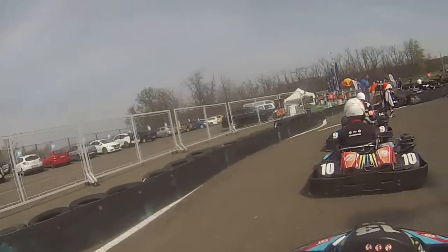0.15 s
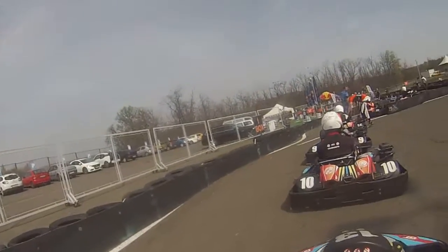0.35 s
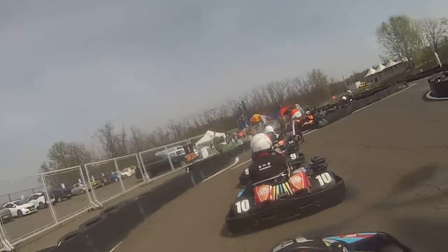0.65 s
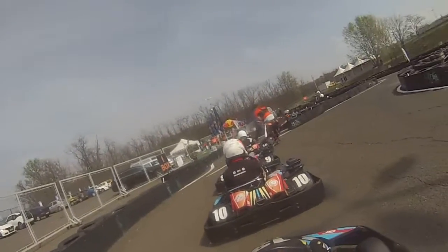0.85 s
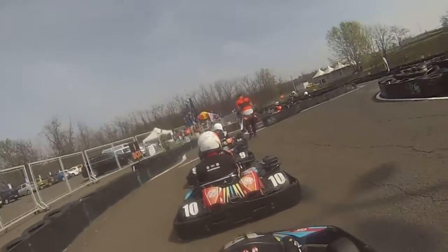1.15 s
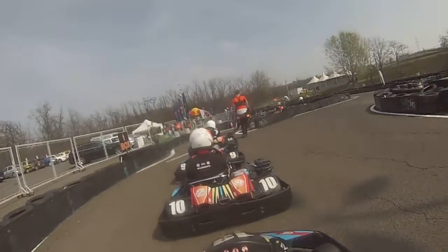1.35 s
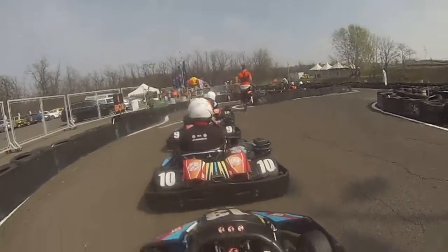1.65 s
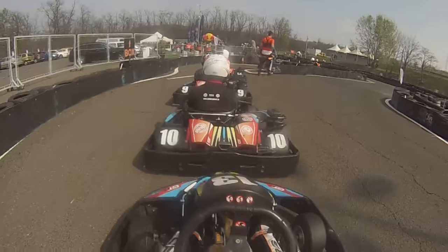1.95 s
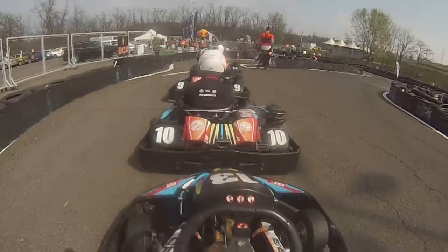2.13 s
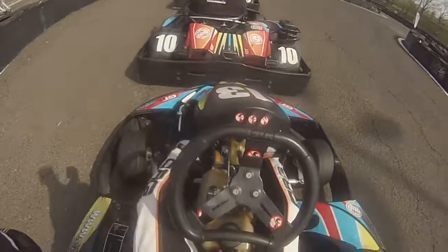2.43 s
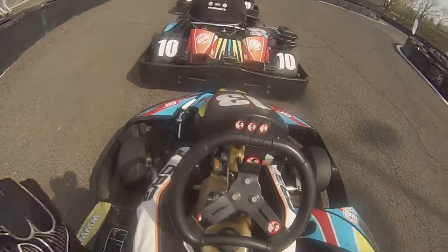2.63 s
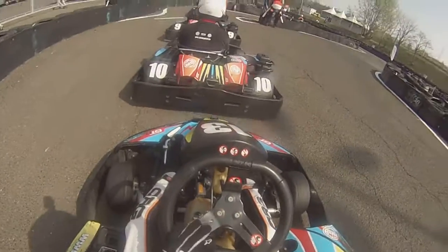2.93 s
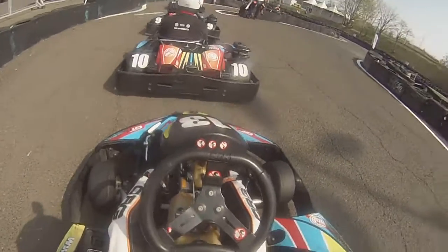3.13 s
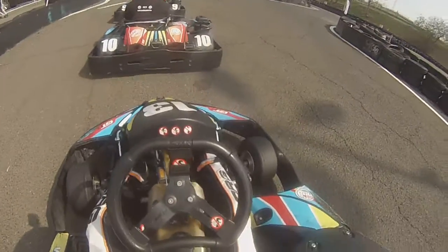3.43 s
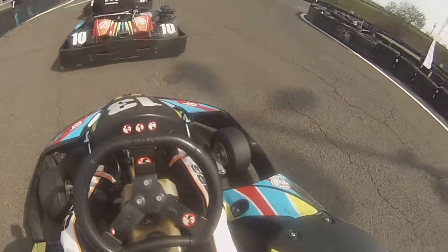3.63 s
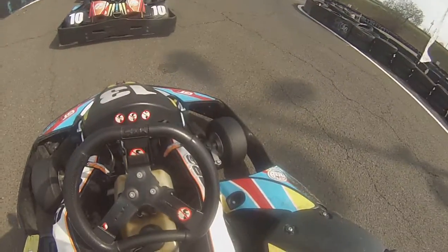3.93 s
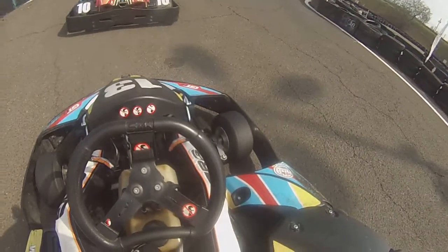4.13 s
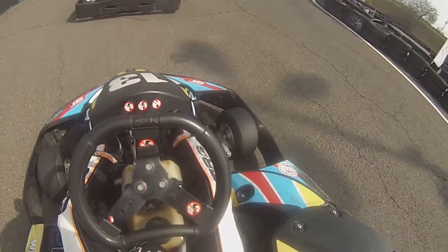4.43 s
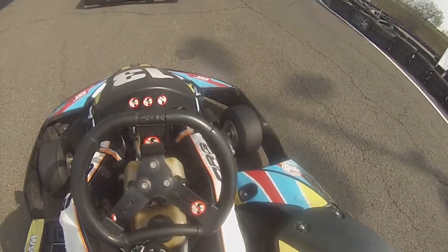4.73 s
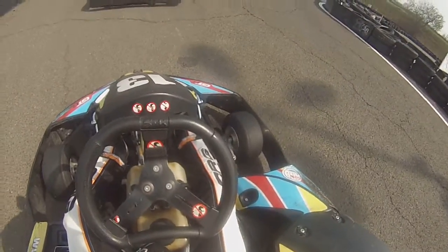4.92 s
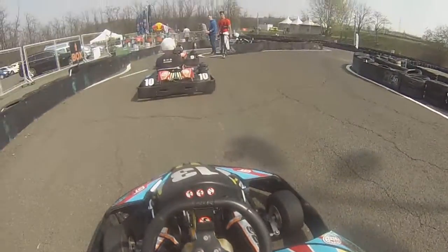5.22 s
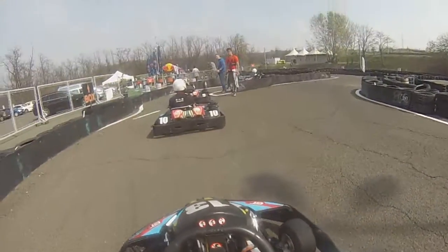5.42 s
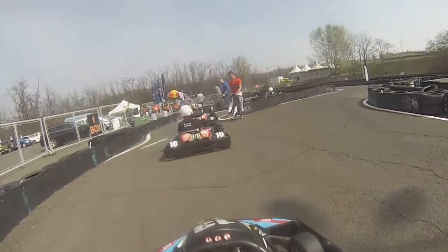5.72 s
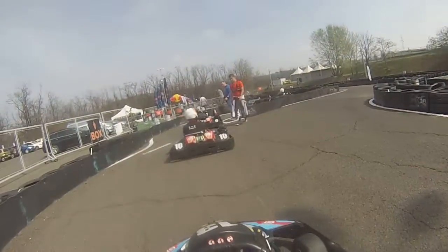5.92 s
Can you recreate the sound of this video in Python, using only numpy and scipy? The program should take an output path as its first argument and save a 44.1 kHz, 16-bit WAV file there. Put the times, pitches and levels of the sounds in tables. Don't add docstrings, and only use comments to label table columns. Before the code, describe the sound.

Close, muffled sound from a sealed camera on a helmet at an outdoor kart track. A four-stroke single-cylinder engine starts with a short rev at about 0.3 s, then sinks to a slow, lumpy idle of roughly fourteen firings a second, with pulsing gas hiss, valve ticking, hollow drone and deep rumble. From 1.87 s a glove fumbles against the helmet: soft low bumps and small cracks, the hardest crack and boom at 2.2 s, then rapid knocks to 2.33 s. The engine ducks almost away and returns by 2.48 s. Another kart ahead adds a bright rasp from 2.5 to 3 s, fading. The idle continues, more ringing and mid-heavy, with strong low throbbing around 4 to 4.7 s. A sharp rev swells at 5 s with a deep helmet shudder, eases at 5.4 s, then revs higher at 5.7 s and falls toward the end.

```python
import sys
import numpy as np
from scipy import signal
from scipy.fft import rfft, irfft
from scipy.io import wavfile
from scipy.ndimage import uniform_filter1d

SR = 44100
rng = np.random.default_rng(int(sys.argv[2]) if len(sys.argv) > 2 else 0)


def voltage_ratio(decibels):
    exponent = np.asarray(decibels, float) / 20
    return 10 ** exponent


def put_to_file(sound):
    columns = np.atleast_2d(sound).T
    safe = np.clip(columns, -1, 1)
    whole_steps = np.round(safe * 32767)
    wavfile.write(sys.argv[1], SR, whole_steps.astype(np.int16))


N = 267687
T = np.arange(N) / SR

# time_s, cycles_per_s
ENGINE_SPEED = [(0.0, 13.81), (0.24, 18.65), (0.38, 19.66), (0.67, 16.53), (0.92, 15.41), (1.86, 13.58),
                (2.46, 14.37), (2.77, 13.23), (3.64, 13.62), (4.02, 13.13), (4.28, 13.38), (4.71, 12.77),
                (4.93, 19.36), (5.09, 20.81), (5.4, 16.86), (5.67, 22.63), (5.8, 22.62), (6.07, 17.98)]
START_CYCLE, IDLE_CYCLES_PER_S = .56, 14
# time_s, level_db
SEAT_SHAKE = [(0, -30), (.25, -28), (.5, -29.5), (.62, -39.5), (.75, -35.5), (1.3, -49), (2.7, -29),
              (3.45, -40.5), (4.05, -28), (4.65, -26.5), (4.98, -24.5), (5.08, -36.5), (5.26, -28),
              (5.37, -29), (5.48, -23.5), (5.62, -31.5), (5.8, -21.5), (6.07, -31)]
# time_s, level_db at the padding resonance
HELMET_CONTACT = [(0, -56), (.3, -45), (.75, -46.5), (1.3, -61.5), (2.7, -41), (2.85, -32), (3.1, -46),
                  (3.45, -42.5), (3.9, -25), (4.1, -22), (4.5, -21.5), (4.72, -31.5), (4.84, -23.5),
                  (4.94, -24.5), (5.03, -11.5), (5.16, -27), (5.4, -37), (6.07, -54)]
ORDER_LEVELS = [3.5, 3, -3.5]
ORDER_LAGS = [.4, -.43, -.3, -.4]
PADDING_HZ, PADDING_WIDTH_HZ, PADDING_STEEPNESS = 59, 16.4, 2.18

# time_s, hiss_db
ENGINE_EFFORT = [(0, -50), (.3, -45.5), (.6, -47.5), (1.2, -51.5), (2.03, -51), (2.56, -40.5),
                 (2.84, -42.5), (3.2, -45.5), (4.1, -44.5), (4.7, -44), (4.95, -36), (5.36, -40.5),
                 (5.62, -35), (5.92, -38.5), (6.07, -37.5)]
# time_s, bent_share (0-1), exhaust_ring_db
HEAD_POSE = [
    (0, 0, -76),
    (1.8, .1, -76),
    (2.9, .9, -68),
    (3.4, 1, -55),
    (4.7, 1, -54),
    (5.1, .2, -68),
    (6.07, 0, -74),
]
# head_up_db, head_down_db
TREBLE_LEVELS = (-9.5, -14)
DRONE_LEVELS = (-5, -6)
RUMBLE_LEVELS = (-8.5, -3.5)
# time_s, shell_gain_db, length_s
THROTTLE_BLIPS = [
    (0.322, 7.5, 0.14),
    (1.655, 5.5, 0.084),
    (2.652, 3, .15),
    (4.406, 7, 0.18),
    (4.995, 9.5, 0.13),
    (5.633, 5, 0.15),
]
RUMBLE_THROTTLE_SHARE = 0.38
# pitch_hz, width_hz, head_up_db, head_down_db
CASE_MODES = [(537, 330, -12.5, -22.5), (828, 336, -10.5, -5), (1167, 46, -7, -0.5), (1436, 240, -1.5, 2),
              (1760, 260, -9, -7), (2240, 346, -5.5, -3), (2383, 190, -18, -3.5), (3150, 520, -20, -51),
              (3902, 680, -15.5, -12.5), (4654, 180, -18.5, -16), (5070, 980, -23.5, -18),
              (6580, 1100, -27, -19.5), (7820, 380, -31, -23), (8840, 400, -34, -26),
              (9600, 1100, -44, -34), (11870, 700, -40, -31.5), (12900, 500, -47, -36),
              (14300, 500, -49, -35)]
ZONE_BORDERS = [1900, 3000, 5500]
# place_cycles, length_cycles, then level_db over the steady hiss in each zone
GAS_BURSTS = [(.44, .1, 3.5, 1, 0, 0), (.74, .09, 4, 3.5, 6, 4.5), (.0, .1, 0, 5.5, 5, 9)]
BURST_FLATTENING = [0, 1.5, 1.5, .4]
# pitch_hz, place_cycles, length_cycles, level_db under the hiss, rise_db per doubled speed
PART_RINGS = [(1400, .4, .11, -13, 8), (1480, .73, .1, -13, 8), (2260, .05, .07, -14, -8),
              (3950, .76, .06, -23, 6), (5250, .02, .05, -26, -6), (6600, .0, .05, -29, 0),
              (11800, .0, .04, -44, 0)]
# pitch_hz, width_hz, level_db
DRONE_MODES = [(161, 48, -2), (300.5, 50, 3.5), (347, 50, -3), (472, 190, -11.5)]
DRONE_THROB = .5
# pitch_hz, level_db per hertz
RUMBLE_SPECTRUM = [(5, 0), (12, 14), (25, 8), (60, 10), (85, 2), (150, 0), (220, -6), (400, -12),
                   (900, -24), (2500, -60), (20000, -130)]

# start_s, crack_peak_db, shell_db and tick_db compared with the crack
GLOVE_KNOCKS = [(1.8919, -30, 3, -25), (1.896, -24, -0.5, -36), (1.905, -26, 1.5, -34),
                (1.9293, -37, -24, -13.5), (2.077, -40.5, 0, -10), (2.1346, -30, 2, -27),
                (2.1942, -33.5, 5.5, -2), (2.2025, -26, -24, -24), (2.208, -5, -13.5, -8.5),
                (2.215, -22, -2, -21), (2.2233, -17, -0.5, -8), (2.2362, -13, -21, -11.5),
                (2.2471, -17, -2.5, -9), (2.262, -20, -2.5, -12), (2.2845, -25.5, 3.5, -28),
                (2.2935, -17, -3.5, -9.5), (2.302, -19.5, -1, -35), (2.3204, -36.5, 4.5, -38),
                (2.331, -43, -7, -8)]
# pitch_hz, width_hz, level_db
LID_MODES = [(765, 87, -10.5), (1372, 280, 1), (2066, 450, 0), (2580, 270, -27)]
# pitch_hz, width_hz, level_db
SHELL_MODES = [(158, 47, 4), (295, 52, 3.5), (477, 180, -11.5), (560, 250, -15.5)]
# start_s, peak_db, pitch_hz, fade_s (by 60 dB), direction
HELMET_SHOVES = [(1.865, -17.5, 56, 0.1, -1.06), (1.9093, -8.5, 63.5, 0.053, 0.92),
                 (1.943, -14, 60, 0.39, 0.68), (2.135, -17.5, 70.6, 0.15, -0.64), (2.181, -14, 50, .06, -1),
                 (2.191, -2, 73, 0.17, 0.81), (2.216, -1, 130, .02, 1), (2.2205, 4, 75, .035, -1),
                 (2.237, -14, 45, 0.096, 1), (2.298, -10, 51, 0.17, 0.73), (2.319, -5.5, 59, 0.041, -1),
                 (2.327, -8, 59, 0.38, 0.74), (2.473, -20.5, 54.3, 0.97, 0.91),
                 (2.562, -18, 60.7, 0.071, 1), (2.883, -21, 57.8, 0.23, 0.75)]
# time_s, gain_db
GAIN_DUCK = [
    (2.2, 1),
    (2.23, -20),
    (2.33, -23.5),
    (2.42, -18),
    (2.465, -14.5),
    (2.485, -8.5),
]

# time_s, firings_per_s, level_db
KART_AHEAD = [
    (2.3, 17, -74),
    (2.48, 17.5, -49),
    (2.6, 19, -47),
    (2.9, 19.4, -50.5),
    (3.0, 19.4, -58),
    (3.3, 19.4, -76),
]
AHEAD_FIRES_S = 2.709
# order (multiple of the firing rate), level_db over the rasp
AHEAD_NOTE = [(6, 4), (9, 2), (12, -4), (14.5, 5)]
SELF_NOISE_DB = -88


def unit(x):
    return x / np.sqrt(np.mean(x ** 2))


def curves(rows):
    time_s, *columns = np.transpose(rows)
    return [np.interp(T, time_s, column) for column in columns]


def walk(rate):
    hold = int(SR / rate)
    steps = np.repeat(rng.standard_normal(N // hold + 1), hold)
    return 0.682 * uniform_filter1d(uniform_filter1d(steps, hold), hold)[:N]


def colour(x, power, size=8192):
    hz = np.arange(size // 2 + 1) * SR / size + 1
    cepstrum = irfft(np.log(power(hz)) / 2)
    cepstrum[1:size // 2] *= 2
    cepstrum[size // 2 + 1:] = 0
    response = irfft(np.exp(rfft(cepstrum)))
    return signal.fftconvolve(x, response)[:N]


def resonances(modes):
    def power(f):
        total = 0
        for hz, width, db in modes:
            off = (f - hz * hz / f) / width
            total = total + voltage_ratio(db) ** 2 / (1 + off ** 2) ** 1.5
        membrane = 1 + (f / 12500) ** 8
        return total / membrane
    return power


def zones(x):
    lows = []
    for hz in ZONE_BORDERS:
        lowpass = signal.butter(3, hz, fs=SR, output="sos")
        lows.append(signal.sosfiltfilt(lowpass, x))
    return np.diff([0 * x, *lows, x], axis=0)


def through_case(x, down):
    head_up = colour(x, resonances([(hz, width, up_db) for hz, width, up_db, _ in CASE_MODES]))
    head_down = colour(x, resonances([(hz, width, down_db) for hz, width, _, down_db in CASE_MODES]))
    return (1 - down) * head_up + down * head_down


def engine_shake(cycle):
    speed, seat_db, contact_db = curves(ENGINE_SPEED)[0], curves(SEAT_SHAKE)[0], curves(HELMET_CONTACT)[0]
    order_levels = [seat_db]
    for order, db in enumerate(ORDER_LEVELS, start=3):
        hz = order * speed
        off = (hz - PADDING_HZ ** 2 / hz) / PADDING_WIDTH_HZ
        order_levels.append(contact_db + db - 10 * PADDING_STEEPNESS * np.log10(1 + off ** 2))
    shake = voltage_ratio(seat_db - 23.0) * np.cos(2 * np.pi * (cycle + 0.51))
    for k, db in enumerate(order_levels):
        unsteady_level = voltage_ratio(db + 1.0 * walk(3.7))
        turns = (k + 2) * cycle + ORDER_LAGS[k] + 0.022 * walk(12)
        shake = shake + unsteady_level * np.cos(2 * np.pi * turns)
    return np.sqrt(2) * shake


def air_levels(down):
    hiss_db = curves(ENGINE_EFFORT)[0]
    boom_db = sum(db * np.exp(-((T - s) / length) ** 2) for s, db, length in THROTTLE_BLIPS)
    treble_db, drone_db, rumble_db = (up + (bent - up) * down
                                      for up, bent in (TREBLE_LEVELS, DRONE_LEVELS, RUMBLE_LEVELS))
    return (hiss_db, treble_db, hiss_db + drone_db + boom_db,
            hiss_db + rumble_db + RUMBLE_THROTTLE_SHARE * boom_db)


def gas_bursts(cycle):
    level = 1
    depth = (IDLE_CYCLES_PER_S / curves(ENGINE_SPEED)[0]) ** np.array(BURST_FLATTENING)[:, None]
    for place, length, *zone_db in GAS_BURSTS:
        since = cycle - place + .3
        count = np.floor(since).astype(int) + 1
        luck = voltage_ratio(1.5 * rng.standard_normal((count[-1] + 1, 4)))[count].T
        off = since % 1 - .3
        side_length = np.where(off < 0, .6 * length, 1.3 * length)
        shape = np.exp(-(off / side_length) ** 2)
        level = level + (voltage_ratio(zone_db)[:, None] - 1) * luck * shape * depth
    return level


def gas_hiss(cycle, down, treble_db):
    grit = rng.standard_normal(N) * voltage_ratio(0.24 * walk(400) + 0.51 * walk(45))
    low, middle, upper, top = zones(through_case(grit, down)) * gas_bursts(cycle)
    return voltage_ratio(1.0) * unit(low + middle) + voltage_ratio(-9.5) * unit(upper) + voltage_ratio(treble_db - 2.5) * unit(top)


def part_rings(cycle):
    total = 0
    doublings = np.log2(curves(ENGINE_SPEED)[0] / IDLE_CYCLES_PER_S)
    for hz, place, length, db, rise_db in PART_RINGS:
        off = (cycle - place + .5) % 1 - .5
        puff = np.exp(-(off / length) ** 2) * voltage_ratio(1.5 * walk(20))
        tone = np.cos(2 * np.pi * (hz * T + 2.0 * walk(45)))
        total = total + voltage_ratio(db + rise_db * doublings) * unit(puff * tone)
    return total


def exhaust_ring(cycle):
    puff = np.exp(-((cycle % 1 - .79) / .06) ** 2)
    return unit(puff * np.cos(2 * np.pi * (795 * T + .15 * walk(20))))


def shell_drone(cycle):
    throb = 1 + DRONE_THROB * np.cos(4 * np.pi * (cycle - .12))
    drive = rng.standard_normal(N) * voltage_ratio(1.8 * walk(30)) * throb
    return unit(colour(drive, resonances(DRONE_MODES)))


def rolling_rumble():
    hz, db = np.transpose(RUMBLE_SPECTRUM)
    unsteady = rng.standard_normal(N) * voltage_ratio(2 * walk(9.1))
    return unit(colour(unsteady, lambda f: voltage_ratio(np.interp(np.log(f), np.log(hz), db)) ** 2))


def engine_air(cycle):
    down, ring_db = curves(HEAD_POSE)
    hiss_db, treble_db, drone_db, rumble_db = air_levels(down)
    air = voltage_ratio(hiss_db) * (gas_hiss(cycle, down, treble_db) + part_rings(cycle))
    air = air + voltage_ratio(ring_db) * exhaust_ring(cycle)
    air = air + voltage_ratio(drone_db - 1.0) * shell_drone(cycle)
    return air + voltage_ratio(rumble_db + 12) * rolling_rumble()


def glove_knocks():
    crack, thud, tick = np.zeros((3, N))
    t = T[:SR // 10]
    for start_s, db, shell_db, tick_db in GLOVE_KNOCKS:
        i = int(start_s * SR)
        span = slice(i, i + len(t))
        rough = rng.standard_normal(len(t))
        blow = np.exp(-t / .0018)
        crack[span] += voltage_ratio(db) * rough * (blow + 0.16 * np.exp(-t / 0.02))
        tick[span] += voltage_ratio(db + tick_db) * rough * (blow + .06 * np.exp(-t / 0.01))
        thud[span] += voltage_ratio(db + shell_db) * (np.exp(-t / 0.00058) + 0.41 * rough * np.exp(-t / 0.017))
    lid = zones(colour(crack, resonances(LID_MODES)))[:2].sum(axis=0)
    ticks = voltage_ratio([19, 13]) @ zones(through_case(tick, 0))[2:]
    shell = colour(thud, resonances(SHELL_MODES))
    return voltage_ratio(9.5) * lid + ticks + voltage_ratio(18.5) * shell


def helmet_shoves():
    swing = np.zeros(N)
    for start_s, db, hz, fade_s, direction in HELMET_SHOVES:
        t = np.maximum(T - start_s, 0)
        swing += direction * voltage_ratio(db - 60 * t / fade_s) * np.sin(2 * np.pi * hz * t)
    return uniform_filter1d(uniform_filter1d(swing, size=90), size=70)


def kart_ahead():
    rate, db = curves(KART_AHEAD)
    cycle = np.cumsum(rate) / SR
    cycle = cycle - np.interp(AHEAD_FIRES_S, T, cycle)
    off = (cycle + .5) % 1 - .5
    puff = .2 + np.exp(-(off / .12) ** 2)
    bright = zones(through_case(rng.standard_normal(N), 0.64))[2:].sum(axis=0)
    rasp = unit(puff * bright)
    deep = colour(rng.standard_normal(N), resonances([(225, 93, 0), (750, 730, -6)]))
    growl = unit(puff * deep)
    note = sum(voltage_ratio(gain_db) * np.cos(2 * np.pi * (order * cycle + 0.108 * walk(10)))
               for order, gain_db in AHEAD_NOTE)
    return voltage_ratio(db) * (voltage_ratio(-1.5) * rasp + voltage_ratio(4) * growl + voltage_ratio(1) * note)


def self_noise():
    return voltage_ratio(SELF_NOISE_DB) * rng.standard_normal(N)


def scene():
    cycle = START_CYCLE + np.cumsum(curves(ENGINE_SPEED)[0]) / SR
    engines = engine_shake(cycle) + engine_air(cycle) + kart_ahead() + self_noise()
    bumps = glove_knocks() + helmet_shoves()
    return (engines * voltage_ratio(curves(GAIN_DUCK)[0]) + bumps)[None]


def band_limit(x):
    return signal.sosfilt(signal.butter(12, 15240, fs=SR, output="sos"), x)


def record(dry):
    mix = np.tanh(0.68 * dry) / 0.54
    return band_limit(mix)


dry = scene()
out = record(dry)
put_to_file(out)
```